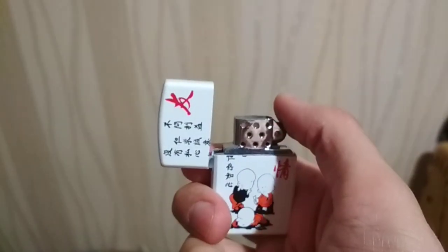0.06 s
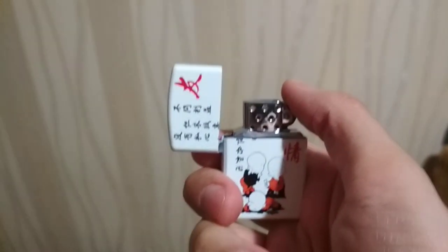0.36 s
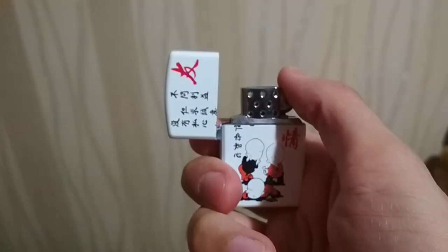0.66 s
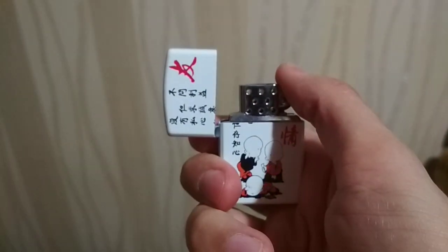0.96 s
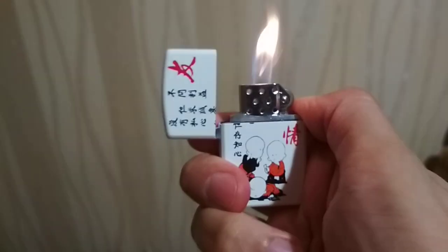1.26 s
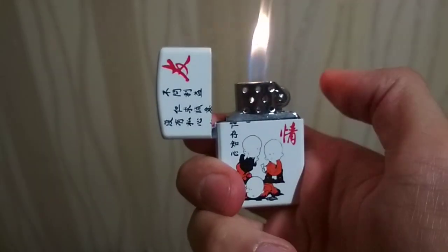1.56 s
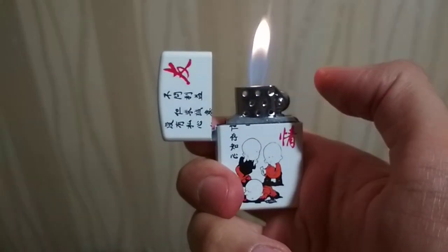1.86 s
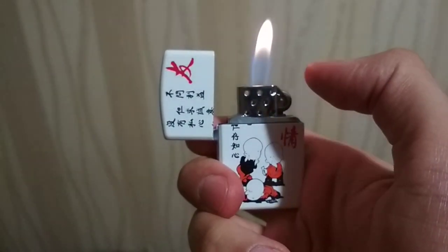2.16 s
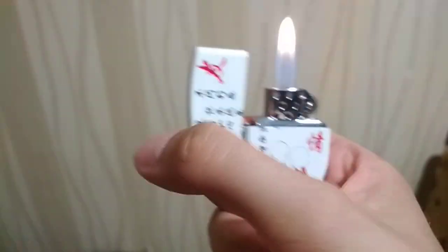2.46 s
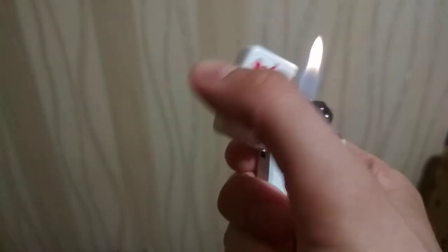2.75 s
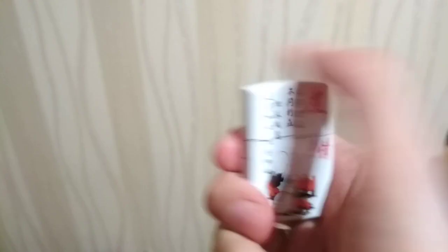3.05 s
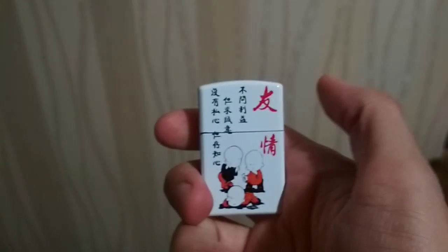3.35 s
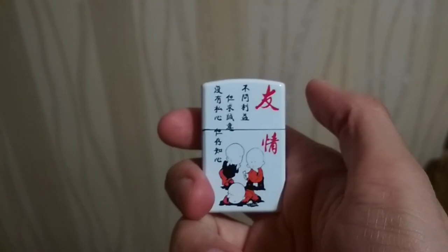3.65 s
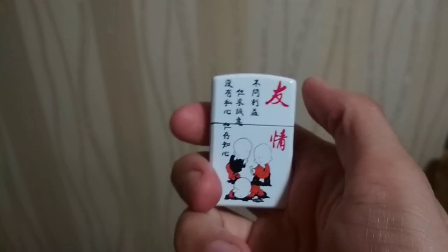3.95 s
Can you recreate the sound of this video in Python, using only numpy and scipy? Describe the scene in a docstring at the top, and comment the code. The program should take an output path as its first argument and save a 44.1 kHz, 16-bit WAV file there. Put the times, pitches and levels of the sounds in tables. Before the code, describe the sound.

A metal lighter is struck alight, then its lid snaps shut with a sharp click.

```python
"""A small quiet room, close on a metal petrol lighter.
Over low room tone, the thumb spins the toothed wheel across the flint: a rasp, then sparks.
The vapour catches with a soft puff and burns with a faint hiss. Then the lid snaps shut:
the case rings, the room answers, and the jolt leaves a low hum in the right channel."""
import sys
import numpy as np
from scipy import signal
from scipy.fft import rfft, irfft
from scipy.io import wavfile

SR = 44100
rng = np.random.default_rng(int(sys.argv[2]) if len(sys.argv) > 2 else 0)


def master_out(mix):
    """Clip the mix to full scale and print it as 16-bit PCM to the path in sys.argv[1]."""
    frames = np.transpose(np.atleast_2d(mix))
    ceiling = np.clip(frames, -1, 1)
    pcm = np.round(ceiling * 32767).astype(np.int16)
    wavfile.write(sys.argv[1], SR, pcm)


N = 176400
TIME = np.arange(N) / SR

# Noise colours, all (frequency [Hz], relative level [dB]):
RUMBLE_COLOUR = [(25, -7), (50, -3), (85, 2), (130, 3), (160, -9.5), (215, 0), (320, -12), (450, -17),
                 (560, -23), (680, -35), (1000, -36.5), (1650, -45), (5000, -53), (6500, -70)]  # low bed of the room
SCUFF_COLOUR = [(1500, -29), (2150, -16), (2330, 2), (2520, -19), (2850, -19), (3020, -10), (3250, -21),
                (3530, 3.5), (3750, -26), (4500, -38)]  # thumb settling on the wheel
GRIND_COLOUR = [(240, -56), (400, -27.5), (1060, -36.5), (1350, -22.5), (1960, -22), (2220, -3.5),
                (2670, -2.5), (3810, -13.5), (5030, -18.5), (8370, -10.5), (9040, -5), (11400, -0.5),
                (13100, -17.5), (14600, -15.5), (16000, -22)]  # wheel biting the flint
SPARK_COLOUR = [(240, -49.5), (400, -19), (839, -9), (1180, -22.5), (2320, -7.5), (3260, -28.5),
                (4730, -18), (5110, -24.5), (5350, -18), (5780, -21), (6340, -12), (7870, -19), (9610, 2.5),
                (11900, -6.5), (16000, -18.5)]  # sparks flying
FLARE_COLOUR = [(40, -7), (110, -2.5), (225, -6.5), (370, -22.5), (520, -27), (680, -19.5), (1000, -34),
                (1500, -42)]  # vapour catching
RUSTLE_COLOUR = [(300, -2), (600, -3.5), (1300, -11.5), (2000, -21.5)]  # soft wash around the hum
CLACK_COLOUR = [(470, -33), (800, -3), (1260, -4), (1920, -1), (3020, -18), (6170, -12.5), (7170, -19),
                (7830, -15), (8440, -17), (9330, 0), (10200, -7.5), (11300, -3.5), (12300, -17),
                (14800, -1), (16000, -3)]  # lid hitting the case
ECHO_COLOUR = [(300, -9), (450, -10.5), (640, -19), (900, -14.5), (1250, -15.5), (1550, -6), (2400, -8),
               (2750, -20), (3200, -14), (4000, -9), (4700, -15.5), (6200, -10), (8200, -18), (9400, -6.5),
               (10000, -9.5), (11000, -7), (12500, -11), (15200, -4.5), (16000, -11.5)]  # the room's answer to the snap

# Narrow room-tone bands that breathe: (low [Hz], high [Hz], base level [dB], swing [dB])
SWELL_BANDS = [(490, 550, -83.5, 5), (370, 430, -84, 4), (900, 1200, -98, 5)]
# Fader ride on those bands: (time [s], gain [dB])
SWELL_RIDE = [(0, 0.5), (1.0, -1), (1.5, -7.5), (1.7, 6), (1.95, 5), (2.1, -1.5), (2.45, 2.5), (2.7, -8.5),
              (3.4, -2), (4, -13.5)]
# Hiss before, during and after the flame: (low [Hz], high [Hz], left level [dB], right level [dB])
HISS_UNLIT = [(5830, 6595, -104, -78), (8850, 11000, -85, -68), (13200, 15000, -79, -67)]
HISS_BURNING = [(8800, 11000, -85, -69), (12400, 17000, -72, -65), (13600, 14700, -72, -65)]
HISS_CLOSED = [(2000, 8800, -101, -80), (8800, 11000, -84, -70.5), (12700, 15900, -89, -80)]
# Fader ride on the burning hiss: (time [s], gain [dB])
FLAME_RIDE = [(1.2, 1), (1.42, 2), (1.55, 0.5), (1.75, 0.5), (2.2, -0.5), (2.42, 0.5), (2.7, 0), (2.9, -6)]
# Envelope of the hum: (time [s], level [dB])
HUM_ENVELOPE = [(2.955, -46), (2.965, -21), (2.99, -33.5), (3.012, -22), (3.10, -23), (3.14, -30.5),
                (3.175, -55), (3.21, -38), (3.28, -36.5), (3.42, -43), (3.7, -58), (4.0, -74)]
# Its overtones: (harmonic [number], relative level [dB])
HUM_OVERTONES = [(3, -33.5), (5, -42)]
# Thumb force on the wheel, heard as the rasp's envelope: (time [s], level [dB])
THUMB_FORCE = [(1.160, -73.5), (1.162, -38), (1.164, -38.5), (1.167, -53), (1.171, -38), (1.179, -35),
               (1.187, -23.5), (1.191, -31), (1.1955, -20), (1.202, -27), (1.209, -35.5), (1.222, -49.5),
               (1.24, -78.5)]
# Puffs of igniting vapour: (time [s], level [dB], width [s])
PUFFS = [(1.2204, -33.5, .0011), (1.2354, -40, 0.0016), (1.2498, -22.5, .0016)]
# Hits of cam and lid: (time [s], level [dB], decay [s], pan L-R [dB])
LID_HITS = [(2.9313, -44, 0.0033, -12), (2.9555, -10, 0.00076, -1), (2.956, -20, 0.00087, -2.5),
            (2.958, -12, .001, -1), (2.987, -36, .002, -10)]
# Hollow modes of the closed lid: (frequency [Hz], level [dB], t60 [s])
KNOCK_MODES = [(1600, -23, .025), (1950, -25, .025)]
# Ringing modes of the case: (frequency [Hz], relative level [dB], t60 [s], pan L-R [dB])
CASE_MODES = [(1584, -9, 0.26, -2), (2344, -12.5, .25, -2.5), (3600, -23, .3, 0), (5790, -19, .18, 0),
              (9350, 8, .25, -7), (9420, 2, .26, -6), (10243, -9, .2, -3), (10875, -5, .2, -2),
              (11100, -4, .22, -3), (11800, -7, .2, -2), (13683, -8, .24, 3), (14290, -6, .2, 5),
              (14700, -4, .2, 5), (15230, 3, .2, 8), (15325, 3, .18, 8.5)]
# Stereo image of the clack and of its echo: (frequency [Hz], pan L-R [dB])
CLACK_BALANCE = [(800, -7), (2000, -3.5), (2600, 3), (5000, -2.5), (10500, -6), (13000, 0), (15000, 10)]
ECHO_BALANCE = [(500, -3.5), (2000, -1), (6000, 0.5), (9400, -3), (12000, 0), (15000, 7)]
# Brief dips in the right side of the lid's ring and echo: (start [s], end [s], depth [dB])
RIGHT_DIPS = [(2.961, 2.984, -34), (3.026, 3.055, -38)]

SNAP_S = 2.9563  # cue for the lid's ring, knock and echo
EDGE_S = .0011  # quick fade on the dips and on the echo's attack


def from_db(db):
    """Decibels to gain."""
    return 10 ** (np.asarray(db) / 20)


def rms_one(x):
    """Scale to unit rms."""
    return x / np.sqrt(np.mean(x ** 2) + 1e-20)


def level(curve):
    """Gain envelope from (time [s], level [dB]) points; silent before the first."""
    return from_db(np.interp(TIME, *np.transpose(curve), left=-np.inf))


def pan(db):
    """Left and right gains, negative leaning right; the louder side has gain 1."""
    return from_db([[min(db, 0)], [min(-db, 0)]])


def fade_in(s, edge_s):
    """Smooth rise from 0 to 1 around time s."""
    return .5 + .5 * np.tanh((TIME - s) / edge_s)


def dying(s, t60):
    """Envelope that starts at s and loses 60 dB in t60 seconds."""
    return (TIME >= s) * np.exp(-np.log(1000) * np.maximum(TIME - s, 0) / t60)


def ring(s, hz, t60):
    """One struck mode."""
    return dying(s, t60) * np.sin(2 * np.pi * hz * (TIME - s))


def waver(per_s):
    """Slow random drift of about unit spread."""
    return np.interp(TIME * per_s, np.arange(200), rng.standard_normal(200))


def noise(colour, channels=1, ripple_db=0, ripple_spacing_hz=55.2):
    """Unit-rms coloured noise, rolled off at both ends; ripple adds dense weak resonances."""
    hz, db = np.transpose(colour)
    f = np.maximum(np.fft.rfftfreq(N, 1 / SR), 1)
    bumps = rng.uniform(-1, 1, 1000) * np.sqrt(3)
    ripple = ripple_db * np.interp(f / ripple_spacing_hz, np.arange(1000), bumps)
    eq = from_db(np.interp(np.log(f), np.log(hz), db) + ripple)
    roll_off = (np.minimum(f / hz[0], 1) * np.minimum(hz[-1] / f, 1)) ** 2
    return rms_one(irfft(rfft(rng.standard_normal((channels, N))) * eq * roll_off, N))


def band(low_hz, high_hz, channels=2, order=6):
    """Unit-rms noise between two frequencies."""
    sos = signal.butter(order, [low_hz, high_hz], "band", fs=SR, output="sos")
    return rms_one(signal.sosfilt(sos, rng.standard_normal((channels, N))))


def balanced(x, balance):
    """Lean each frequency to the left or right."""
    lean_db = np.interp(np.fft.rfftfreq(N, 1 / SR), *np.transpose(balance))
    return irfft(rfft(x) * from_db([lean_db / 2, -lean_db / 2]), N)


def reverb(x, t60, predelay_s=.0075, ripple_db=0):
    """Diffuse stereo room tail of unit energy, wet only."""
    wash = noise([(20, 0), (SR / 2, 0)], channels=2, ripple_db=ripple_db)
    tail = (wash * dying(predelay_s, t60))[:, :SR]
    return signal.fftconvolve(x, rms_one(tail) / np.sqrt(SR), axes=1)[:, :N]


def room_tone(rumble_db=-66, drift_db=.5, side_db=-11):
    """The bed: a low rumble with a few narrow bands that swell and fade."""
    mid, side = noise(RUMBLE_COLOUR, channels=2)
    stereo = mid + from_db(side_db) * side * [[1], [-1]]
    rumble = from_db(rumble_db + drift_db * waver(per_s=12)) * stereo
    swells = sum(from_db(db + swing_db * waver(per_s=7)) * band(low, high, channels=1, order=3)
                 for low, high, db, swing_db in SWELL_BANDS)
    return rumble + level(SWELL_RIDE) * swells


def hiss(lit_s=1.2, out_s=2.93, crossfade_s=.03):
    """Thin bands of air, the highest strongest while the flame burns."""
    lit, snuffed = fade_in(lit_s, crossfade_s), fade_in(out_s, crossfade_s)
    burning = lit * (1 - snuffed) * level(FLAME_RIDE) ** 2
    stages = (HISS_UNLIT, 1 - lit), (HISS_BURNING, burning), (HISS_CLOSED, snuffed)
    return sum(np.sqrt(power) * from_db([[left_db], [right_db]]) * band(low, high)
               for bands, power in stages for low, high, left_db, right_db in bands)


def hum(hz=98):
    """The jolt leaves a low tone hard right that swells, dips and fades in a faint rustle."""
    rustle = from_db(-60) * pan(-12.5) * dying(SNAP_S, t60=1.2) * noise(RUSTLE_COLOUR)
    phase = 2 * np.pi * hz * (TIME - SNAP_S)
    overtones = sum(from_db(db) * np.cos(harmonic * phase) for harmonic, db in HUM_OVERTONES)
    return pan(-51.5) * level(HUM_ENVELOPE) * (np.cos(phase) + overtones) + rustle


def thumb_scuff(start_s=.078):
    """The thumb settles on the wheel, barely audible."""
    return from_db(-76) * dying(start_s, t60=.49) * noise(SCUFF_COLOUR, channels=2)


def flint_wheel(teeth_per_s=650, jitter=.15, tooth_decay_s=.00097, drag=.25, spark_s=1.192):
    """Each tooth tears a burst from the flint; the rasp brightens as it gives way and sparks fly."""
    gaps = np.abs(1 + jitter * rng.standard_normal(80)) / teeth_per_s
    bites = THUMB_FORCE[0][0] + np.cumsum(gaps)
    last_bite = bites[np.maximum(np.searchsorted(bites, TIME) - 1, 0)]
    teeth = drag + np.exp(-np.abs(TIME - last_bite) / tooth_decay_s)
    spinning = (TIME > bites[0]) & (TIME < bites[-1])
    teeth /= np.sqrt(np.mean(teeth[spinning] ** 2))
    grind = noise(GRIND_COLOUR)
    mount_resonance = band(2200, 3200, channels=1, order=2)
    sparking = fade_in(spark_s, edge_s=.0014)
    grit = np.sqrt(1 - sparking) * (grind + mount_resonance) + np.sqrt(sparking) * noise(SPARK_COLOUR)
    rasp = level(THUMB_FORCE) * teeth * grit
    return pan(-15.5) * rasp + from_db(-15) * pan(-3) * reverb(rasp, t60=.33, ripple_db=3)


def ignition(peak_s=1.245, rise_s=.016, decay_s=.025, crack_s=1.2438):
    """The vapour catches: puffs and a crack in a short low flare; the last puff stirs a room mode."""
    bloom = np.exp(-np.maximum((peak_s - TIME) / rise_s, (TIME - peak_s) / decay_s))
    flare = from_db(-37.5) * bloom * noise(FLARE_COLOUR)
    crack = from_db(-45) * dying(crack_s, t60=.012) * band(596, 2100, channels=1, order=3)
    puffs = np.zeros(N)
    for s, db, width_s in PUFFS:
        offset = (TIME - s) / width_s
        puffs += from_db(db) * (offset ** 2 - 1) * np.exp(-offset ** 2 / 2)
    room_mode = from_db(-41) * ring(PUFFS[-1][0], hz=229, t60=.24)
    return pan(-2.5) * (flare + crack + puffs + room_mode)


def hinge(rise_s=.03):
    """A thin rub grows as the lid swings and stops when it lands."""
    swing = np.exp(-np.abs(SNAP_S - TIME) / rise_s) * (TIME < SNAP_S)
    return from_db(-62) * pan(-4) * swing * band(2200, 2550, channels=1, order=2)


def lid_thump(stop_s=2.9552, rise_s=.0013, fall_s=.003, rebound=.55, cutoff_hz=468):
    """The snap's weight: pressure builds under the closing lid and swings negative as it stops."""
    t = TIME - stop_s
    pressure = np.where(t < 0, np.exp(-np.abs(t) / rise_s), -rebound * np.exp(-np.abs(t) / fall_s))
    lowpass = signal.butter(6, cutoff_hz, fs=SR, output="sos")
    return from_db(-3.5) * pan(-14) * signal.sosfilt(lowpass, pressure + 1e-18)


def lid_knock():
    """The snap's body: the closing lid sounds its short hollow modes."""
    return pan(-5.5) * sum(from_db(db) * ring(SNAP_S, hz, t60) for hz, db, t60 in KNOCK_MODES)


def case_ring():
    """The snap's shimmer: one blow sets the metal case ringing in its modes."""
    t = TIME[:SR]
    modes = sum(from_db(db - 60 * t / t60) * pan(pan_db)
                * np.sin(2 * np.pi * (hz * t + rng.random((2, 1))))
                for hz, db, t60, pan_db in CASE_MODES)
    blow = np.zeros((1, N))
    blow[0, int(SNAP_S * SR)] = 1
    return signal.fftconvolve(blow, modes, axes=1)[:, :N]


def room_echo(hold_s=.045, slow_db=-9):
    """The snap's tail: early reflections hold the level, then a quick and a slow decay take over."""
    release_s, slow_gain = SNAP_S + hold_s, from_db(slow_db)
    held = fade_in(SNAP_S, EDGE_S) * (TIME < release_s)
    tail = (dying(release_s, t60=.28) + slow_gain * dying(release_s, t60=.4)) / (1 + slow_gain)
    wash = balanced(noise(ECHO_COLOUR, channels=2, ripple_db=5), ECHO_BALANCE)
    return (held + tail) * wash


def right_dips():
    """Channel gains that duck the right side twice."""
    duck_db = sum(depth_db * fade_in(start, EDGE_S) * (1 - fade_in(end, EDGE_S))
                  for start, end, depth_db in RIGHT_DIPS)
    return from_db([np.zeros(N), duck_db])


def lid_snap():
    """The main hit: the cam ticks, the lid lands and chatters; case and room ring on."""
    hits = sum(from_db(db) * pan(pan_db) * (TIME >= s) * np.exp(-np.abs(TIME - s) / decay_s)
               for s, db, decay_s, pan_db in LID_HITS)
    clack = hits * balanced(noise(CLACK_COLOUR, channels=2), CLACK_BALANCE)
    ping = from_db(-33) * case_ring()
    echo = from_db(-34) * room_echo()
    ping_tail = from_db(-11.5) * reverb(ping, t60=.42)
    return (clack + ping + ping_tail + echo) * right_dips()


def scene():
    """The mix: light the flame, shut the lid, all over room tone and hiss."""
    lighting = thumb_scuff() + flint_wheel() + ignition()
    closing = hinge() + lid_snap() + lid_knock() + lid_thump() + hum()
    return lighting + closing + room_tone() + hiss()


def record(dry, cutoff_hz=15850):
    """Soft saturation rounds the peaks; a steep low-pass trims the top."""
    lowpass = signal.ellip(9, .2, 70, cutoff_hz, fs=SR, output="sos")
    return signal.sosfilt(lowpass, np.tanh(dry))


dry = scene()
out = record(dry)
master_out(out)
```